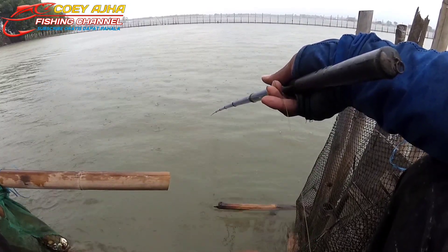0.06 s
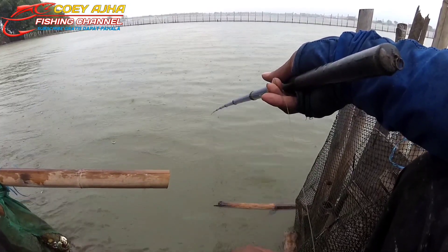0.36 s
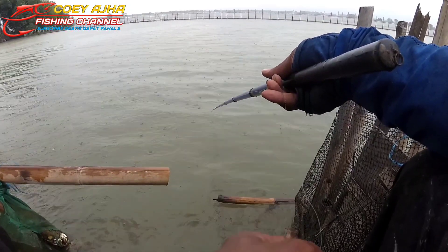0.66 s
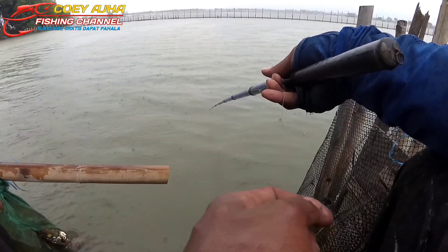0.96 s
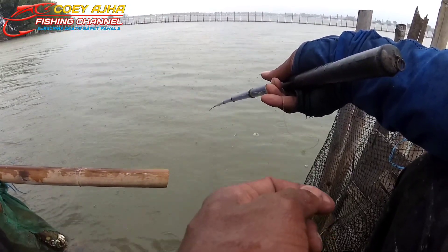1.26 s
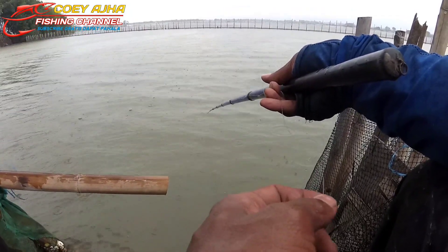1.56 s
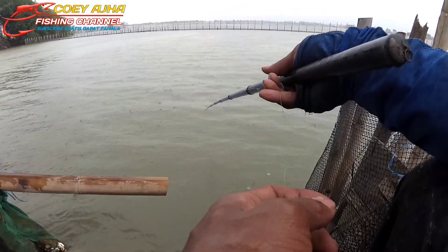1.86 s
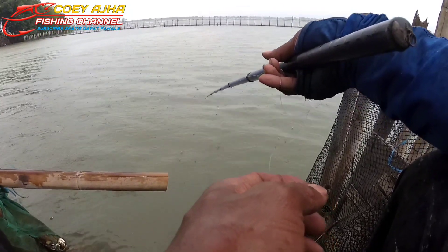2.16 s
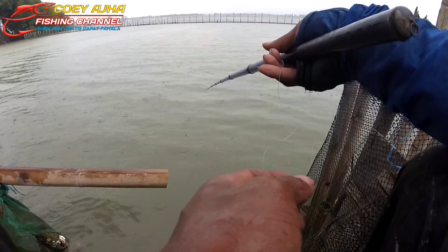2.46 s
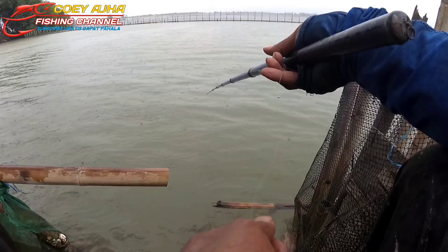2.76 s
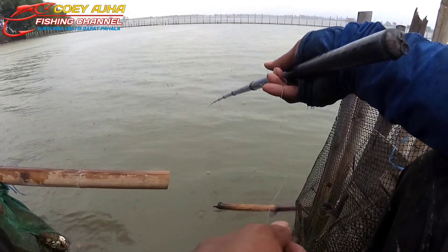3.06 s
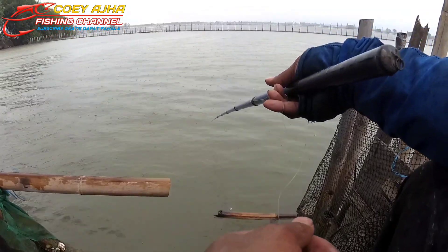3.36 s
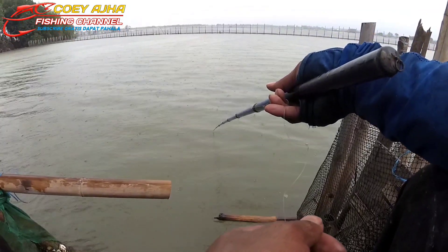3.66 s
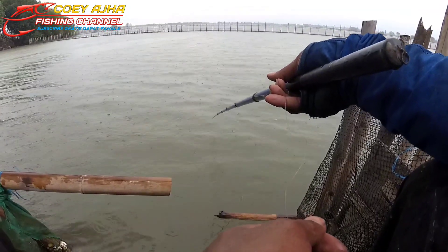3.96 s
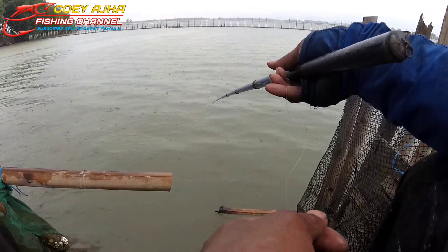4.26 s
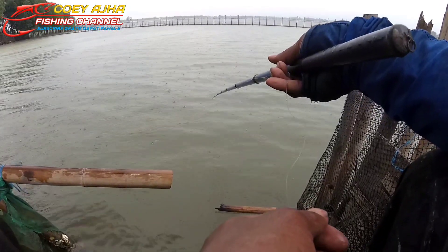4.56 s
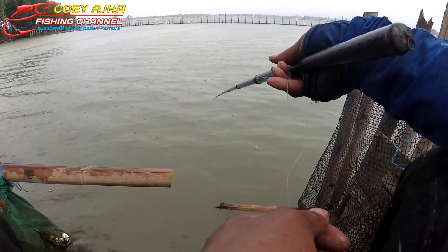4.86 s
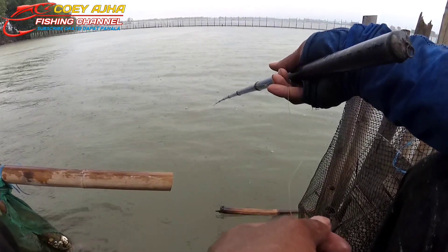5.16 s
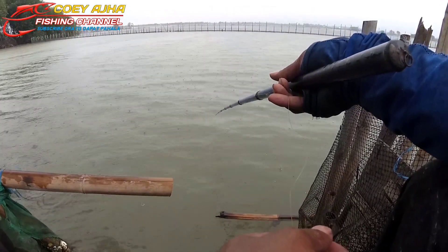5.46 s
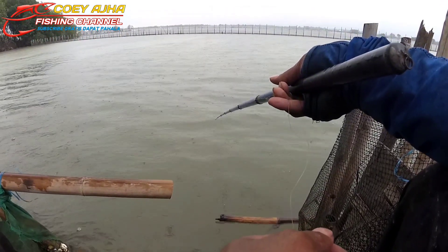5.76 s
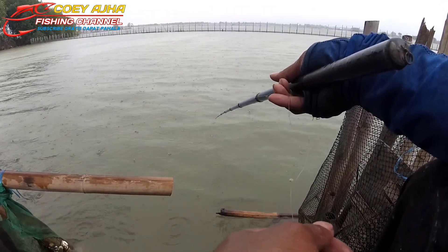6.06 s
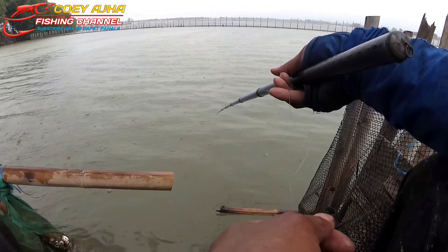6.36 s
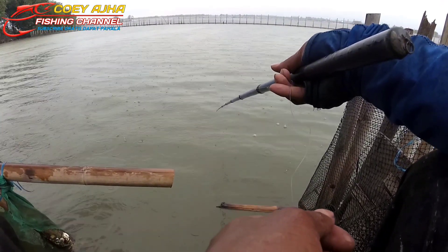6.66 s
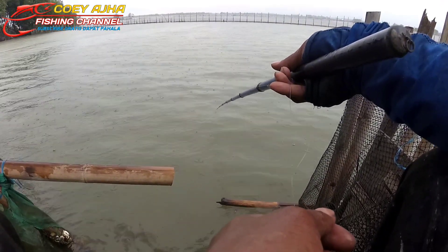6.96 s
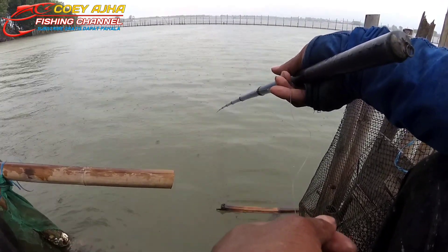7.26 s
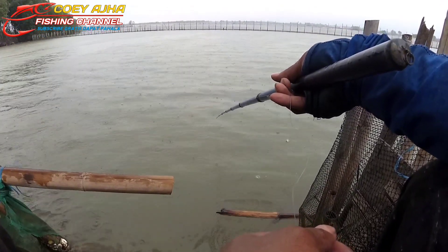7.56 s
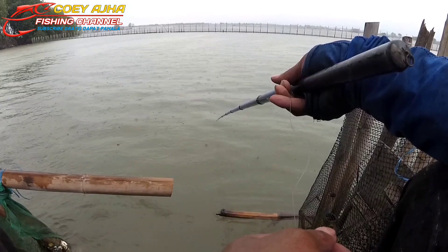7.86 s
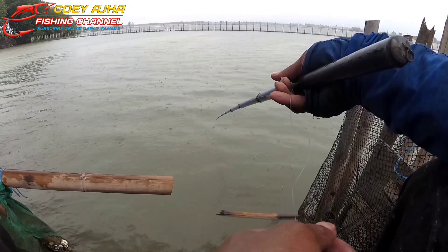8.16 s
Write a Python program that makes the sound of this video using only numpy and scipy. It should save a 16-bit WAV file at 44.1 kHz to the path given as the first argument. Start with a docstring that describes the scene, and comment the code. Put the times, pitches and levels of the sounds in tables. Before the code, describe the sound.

Outdoors on a lake, a gentle drizzle patters throughout, with small plips, bright ticks and hollow plops on water, cloth and a platform. Much louder, irregular taps stand out as drops strike the small microphone itself, toward the left. They cluster early, return in the middle, and peak with an overloaded knock late on, followed by a last double tap. Faint distant rain and hiss fill the gaps.

```python
"""Light rain at a fishing platform on a lake, heard from a small camera worn by the angler.
Drops plip on the water, tick on fabric, plop on the platform and pat on clothing, each a damped mode.
A few strike the camera shell by its left port and ring it; the heaviest thump and overload the input.
Trapped bubbles ring. Underneath: a wash of distant rain, microphone hiss, electronic whine, a far hum."""
import sys
import numpy as np
from scipy import signal
from scipy.fft import rfft, irfft
from scipy.io import wavfile
from scipy.ndimage import uniform_filter1d

SR = 44100
rng = np.random.default_rng(int(sys.argv[2]) if len(sys.argv) > 2 else 0)


def inscribe(sig):
    """Save sig as 16-bit PCM at rate SR to the path in sys.argv[1].

    A 1-D sig is mono; a 2-D sig holds one channel per row.
    Samples are clipped to [-1, 1] before scaling.
    """
    pcm = np.round(np.clip(np.atleast_2d(sig).T, -1, 1) * 32767)
    wavfile.write(sys.argv[1], SR, pcm.astype(np.int16))


N = 370440
TIME_S = np.arange(N) / SR
ALL_HZ = np.arange(N // 2 + 1) * SR / N
DROP_SAMPLES = 4096
DROP_HZ = np.arange(DROP_SAMPLES // 2 + 1) * SR / DROP_SAMPLES

# Drops on the camera shell. Each row: start in seconds, level in dB, bulk in Hz, splash edge in Hz,
# shell ring in dB, crack in dB, right port gain in dB.
SHELL_HITS = [(1.1990, -15.5, 600, 3200, 13, 11, -11.5), (1.4458, -8.5, 224, 3600, -20, -34, -32),
              (1.5559, 6, 486, 2800, 2.5, 14.5, -17.5), (1.567, -9, 130, 3730, 3, 0, -15),
              (2.1347, -15, 250, 12000, -7, -28, -17), (2.8293, -12, 675, 3000, -9, 8, -17),
              (3.483, -26, 2400, 7000, 6, 2, -16), (4.2872, -12, 400, 4560, 4, -1, -15),
              (4.6425, -26, 600, 5000, -11, -16, -7), (4.757, -1.5, 685, 2440, -8, 3, -23),
              (6.5103, -23.5, 700, 3000, -6, -19, -10), (6.7619, 15.5, 546, 5600, 4, -31, -15),
              (7.9575, -9.5, 160, 2280, 13.5, 21, -15), (7.9788, 9, 606, 1960, -6, -8, -26)]


def undb(db):
    """Decibels to gain."""
    return 10 ** (np.asarray(db) / 20)


def resonance(f, hz, width_hz):
    """Response of a damped mode at frequencies f, gain 1 at its centre."""
    return 1j * f * width_hz / (hz ** 2 - f ** 2 + 1j * f * width_hz)


def strike(response):
    """Impulse response, peak 1."""
    wave = irfft(response)
    return wave / np.abs(wave).max()


def add(out, start_s, left, right, lead_s=0):
    """Mix one drop into both channels, the right one lead_s earlier."""
    for channel, wave, at_s in ((0, left, start_s), (1, right, start_s - lead_s)):
        i = int(np.clip(at_s * SR, 0, N - 1))
        out[channel, i:i + DROP_SAMPLES // 2] += wave[:min(DROP_SAMPLES // 2, N - i)]


def noise(gain, top_hz=15250):
    """Noise with the given amplitude per root Hz, up to top_hz."""
    white = rfft(rng.standard_normal(N))
    return irfft(white * gain * (ALL_HZ < top_hz), N) * np.sqrt(SR / 2)


def colour(hz, db):
    """Gain through (Hz, dB) points on a log-frequency axis."""
    return undb(np.interp(np.log(ALL_HZ + 1), np.log(hz), db))


def wander(rate_hz):
    """Smooth random curve, spread near 1."""
    hold = int(SR / rate_hz)
    steps = np.repeat(rng.standard_normal(N // hold + 1), hold)
    return 1.13 * uniform_filter1d(steps, hold)[:N]


def drizzle(count, db, spread_db, hz, octaves, pan_db):
    """Rows for drops() at random moments; faint drops are the most common."""
    when, faintness, pitch, side = rng.random((count, 4)).T
    level_db = db - spread_db * np.sqrt(faintness)
    pitch_hz = hz * 2 ** (octaves * (2 * pitch - 1))
    return list(zip(when * N / SR, level_db, pitch_hz, pan_db + 8 * (side - .5)))


def drops(rows, damping, edge_ratio, scatter, scatter_s, gain_db, lead_s=0, order=2):
    """Each drop rings one damped mode (order 2 swells in softly); nearby surfaces scatter it."""
    out, f = np.zeros((2, N)), DROP_HZ
    fade = np.exp(-np.arange(DROP_SAMPLES) / (SR * scatter_s))
    for start_s, db, hz, pan_db in rows:
        ring = resonance(f, hz, damping * hz) ** order / (1 + 1j * f / (edge_ratio * hz)) ** 2
        echoes = rng.standard_normal((2, DROP_SAMPLES)) * fade / np.linalg.norm(fade)
        left, right = (strike(ring * (1 + scatter * rfft(echo))) for echo in echoes)
        add(out, start_s, undb(db + gain_db) * left, undb(db + gain_db - pan_db) * right, lead_s)
    return out


def distant_wash(lag_s=0.00015, flicker_db=1.8):
    """Distant rain and lapping water flicker; they reach the right port first."""
    # Each row: frequency in Hz, noise level in dB.
    spectrum = [(25, -100), (130, -91), (400, -89), (750, -88.5), (1050, -87.5), (1450, -102), (2500, -100),
                (4300, -100), (6000, -107), (15000, -116)]
    wash = noise(colour(*np.transpose(spectrum))) * undb(flicker_db * wander(35) - 0.76)
    return np.array([np.roll(wash, int(lag_s * SR)), wash])


def microphone_hiss(flicker_db=1.4):
    """Each port has its own hiss; the left one flickers."""
    # Each row: frequency in Hz, left and right density in dB per Hz.
    spectrum = [(25, -100, -106), (125, -91.5, -93), (423, -87, -93), (1000, -91, -91), (1390, -90, -94),
                (1930, -90, -94), (2420, -85.5, -95), (3010, -88.5, -96), (3930, -95.5, -94.5),
                (6300, -99, -100), (11700, -99, -102), (11900, -104.5, -105), (13600, -106, -106),
                (13600, -103, -103.5)]
    hz, left_db, right_db = np.transpose(spectrum)
    left = noise(colour(hz, left_db)) * undb(flicker_db * wander(40))
    return np.array([left, noise(colour(hz, right_db))])


def electronic_whine(readout_hz=60, tone_hz=11210, tone_db=-64.5, fizz_depth=0.95, fizz_db=-1):
    """The camera's electronics whine faintly on the left, pulsing with the sensor readout."""
    # Each row: band centre in Hz, width in Hz, level in dB.
    bands = [(6250, 200, -102), (7170, 100, -98), (7650, 180, -100), (9480, 280, -98), (10100, 110, -93),
             (11210, 100, -87)]
    response = sum(undb(db) * resonance(ALL_HZ, hz, width_hz) * np.exp(2j * np.pi * rng.random())
                   for hz, width_hz, db in bands)
    pulse = np.sin(np.pi * readout_hz * TIME_S) ** 2
    readout = (readout_hz * TIME_S).astype(int)
    offset_cycles = rng.random(readout[-1] + 1)[readout]  # each readout restarts the tone
    tone = pulse * np.sin(2 * np.pi * (tone_hz * TIME_S + offset_cycles))
    fizz = (1 + fizz_depth * (2 * pulse - 1)) * noise(response / (1 + (ALL_HZ / 11700) ** 40))
    return np.array([undb(fizz_db) * fizz + undb(tone_db) * tone, np.zeros(N)])


def lake_plips():
    """Drops on open water, each a small pitched plip."""
    rows = drizzle(count=240, db=-39.5, spread_db=12.5, hz=916, octaves=0.51, pan_db=1.0)
    return drops(rows, damping=0.25, edge_ratio=3.5, scatter=0.74, scatter_s=0.005,
                 gain_db=-2, lead_s=0.00026)


def fabric_ticks(pan_db=11):
    """Fine drops on fabric ring brightly for a few milliseconds."""
    # Each row: start in seconds, level in dB, pitch in Hz.
    clear_ticks = [(0.26, -30, 2390), (.6777, -28, 2580), (0.738, -32.5, 2420), (.9044, -33.5, 2500),
                   (2.0554, -34.5, 2590), (4.3985, -29.5, 2780), (5.1124, -35, 2500), (5.8442, -33.5, 2960),
                   (5.9203, -28.5, 2670), (6.408, -30, 3150), (7.128, -31, 2570), (7.16, -32, 2500),
                   (7.8998, -31.5, 2670)]
    rows = [(*tick, pan_db) for tick in clear_ticks]
    rows += drizzle(count=130, db=-34.5, spread_db=12.5, hz=2760, octaves=0.28, pan_db=12)
    return drops(rows, damping=0.28, edge_ratio=2.9, scatter=1.5, scatter_s=0.0051, gain_db=-2.5)


def hollow_plops():
    """Drops on the platform and water ring for a few cycles and reach the right port first."""
    # Each row: start in seconds, level in dB, pitch in Hz, left minus right in dB.
    clear_plops = [(.2714, -33, 750, 12), (.3271, -33, 444, 4.5), (.6776, -31.5, 890, 1.5),
                   (1.6098, -28.5, 720, 2.5), (2.0506, -33, 560, 0), (2.2926, -36.5, 420, 2),
                   (2.4619, -33.5, 580, 8), (2.9670, -30.5, 890, 0), (2.9678, -30, 1700, 8),
                   (2.9712, -26.5, 520, 3.5), (3.4054, -32, 1030, 0), (4.241, -29.5, 880, 5),
                   (4.2835, -36.5, 355, -3), (4.2868, -23.5, 780, -0.5), (4.9801, -24, 780, 7),
                   (5.5546, -32, 995, -1.5), (5.8448, -29.5, 613, 1), (6.5101, -30.5, 1110, 14),
                   (6.6112, -30, 1450, 13), (6.7347, -29, 1070, 11)]
    rows = clear_plops + drizzle(count=12, db=-37, spread_db=12, hz=576, octaves=0.45, pan_db=-1)
    return drops(rows, damping=0.71, edge_ratio=6.9, scatter=0.83, scatter_s=0.0066,
                 gain_db=-1, lead_s=0.00022)


def cloth_pats(pan_db=31):
    """Cloth swallows a drop within one cycle; the clearest land near the left port."""
    # Each row: start in seconds, level in dB, pitch in Hz.
    clear_pats = [(0.5319, -30.5, 870), (1.7661, -30, 890), (2.1104, -27.5, 555), (2.5961, -29, 815),
                  (3.2547, -38, 450), (3.921, -31.5, 426), (4.9168, -33.5, 360), (5.615, -35.5, 276),
                  (5.738, -28, 393), (6.1347, -27, 334), (6.1635, -28.5, 330), (7.0695, -33, 470),
                  (7.5112, -31, 640), (7.6761, -34.5, 363), (7.7961, -29.5, 710), (8.0969, -31, 660)]
    rows = [(*pat, pan_db) for pat in clear_pats]
    rows += drizzle(count=50, db=-39.5, spread_db=16, hz=463, octaves=0.76, pan_db=4)
    return drops(rows, damping=1.5, edge_ratio=2.0, scatter=0.11, scatter_s=0.0027, gain_db=1.5, order=1)


def droplets(count, db=-30.5, spread_db=4, bulk_hz=2000, edge_hz=4700,
             ring_db=-5, crack_db=-4, right_db=-20):
    """Rows for fine droplets that land on the shell at random moments."""
    return [(when * N / SR, db - spread_db * faintness, bulk_hz, edge_hz, ring_db, crack_db, right_db)
            for when, faintness in rng.random((count, 2))]


def shell_drops(right_cut_hz=2200, right_ring_db=1, spray_db=-40, spray_s=0.003):
    """A drop pushes the shell, which rings: its bulk sets the bass, its splash edge the treble."""
    # Each row: mode frequency in Hz, width in Hz, gain in dB.
    shell_modes = [(1613, 21, -9), (1825, 560, 7.5), (2190, 210, 1), (3680, 620, -8.5), (7370, 1630, 2.5),
                   (10170, 580, -7.5)]
    out, f = np.zeros((2, N)), DROP_HZ
    fade = np.exp(-np.arange(DROP_SAMPLES) / (SR * spray_s))
    shell = sum(undb(db) * resonance(f, hz, width_hz) for hz, width_hz, db in shell_modes)
    crack = resonance(f, hz=2900, width_hz=430)  # only some landing spots strike this mode hard
    for start_s, db, bulk_hz, edge_hz, ring_db, crack_db, right_db in SHELL_HITS + droplets(count=8):
        push = -1j * f * resonance(f, bulk_hz, 1.07 * bulk_hz) / (1 + 1j * f / edge_hz) ** 2
        ring = undb(ring_db) * shell + undb(crack_db) * crack
        left = strike(push * (1 + ring))
        # The far port gets less push and more ring.
        right = strike(push * (1 + undb(right_ring_db) * ring) * 1j * f / (right_cut_hz + 1j * f))
        burst = rng.standard_normal((2, DROP_SAMPLES)) * fade
        spray = undb(spray_db) * irfft(rfft(burst) * resonance(f, hz=4500, width_hz=5000))
        add(out, start_s, undb(db) * (left + spray[0]), undb(db + right_db) * (right + 4 * spray[1]),
            lead_s=-.00002)
    return out


def port_thumps(hz=68.4, edge_hz=1500, delay_s=.0006, peak_db=3, heavy_db=16, right_db=-37):
    """Heavy drops spread over the left port and press on it; lighter ones barely thump."""
    out, f = np.zeros((2, N)), DROP_HZ
    pressure = strike(-1j * f * resonance(f, hz, 1.37 * hz) / (1 + 1j * f / edge_hz) ** 2)
    for start_s, db, *_ in SHELL_HITS:
        thump = undb(peak_db - 3.5 * max(heavy_db - db, 0)) * pressure
        add(out, start_s + delay_s, thump, undb(right_db) * thump)
    return out


def far_hum(waver=0.0046, flicker_db=2):
    """A faint wavering hum over the lake; each swell holds one pitch, then fades."""
    # Each row: middle in seconds, half length in seconds, level in dB, pitch in Hz.
    swells = [(2.46, 0.18, -58.5, 481), (3.0, .1, -65, 480), (3.55, 0.16, -68.5, 338),
              (5.1, 0.94, -69.5, 369)]
    clock_s = TIME_S + np.cumsum(waver * wander(54)) / SR
    hum = np.zeros(N)
    for middle_s, half_s, db, hz in swells:
        envelope = np.exp(-((TIME_S - middle_s) / half_s) ** 4)
        hum += undb(db) * envelope * np.sin(2 * np.pi * hz * clock_s)
    return hum * undb(flicker_db * wander(25.3))


def bubbles(ring_cycles=4.6, rise=0.12, right_db=-6):
    """A bubble trapped by a drop rings and rises in pitch as it nears the surface."""
    # Each row: start in seconds, level in dB, starting pitch in Hz.
    trapped = [(2.9535, -38, 1960), (5.9005, -38, 3080), (6.622, -43, 420)]
    out, t = np.zeros((2, N)), np.arange(DROP_SAMPLES) / SR
    for start_s, db, hz in trapped:
        age = t * hz / ring_cycles
        phase = 2 * np.pi * np.cumsum(hz * (1 + rise * np.minimum(age, 2))) / SR
        wave = undb(db) * 2 * age * np.exp(1 - 2 * age) * np.sin(phase)
        add(out, start_s, wave, undb(right_db) * wave)
    return out


def scene():
    """Near drops over the distant wash, in stereo."""
    on_camera = shell_drops() + port_thumps()
    nearby = cloth_pats() + hollow_plops() + fabric_ticks() + bubbles() + lake_plips()
    return on_camera + nearby + distant_wash() + microphone_hiss() + electronic_whine() + far_hum()


def record(dry, ceiling=.88, top_hz=16000):
    """The hardest drops overload the input; a steep low-pass cuts the top."""
    lowpass = signal.ellip(8, .2, 80, top_hz, fs=SR, output="sos")
    return signal.sosfilt(lowpass, np.clip(dry, -ceiling, ceiling))


dry = scene()
out = record(dry)
inscribe(out)
```